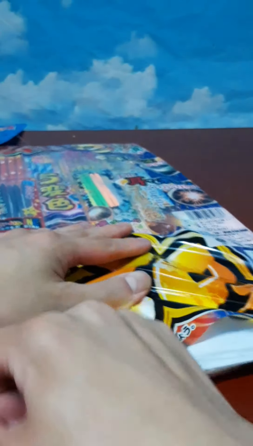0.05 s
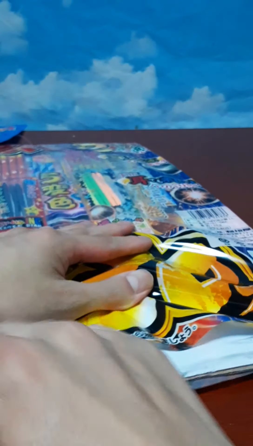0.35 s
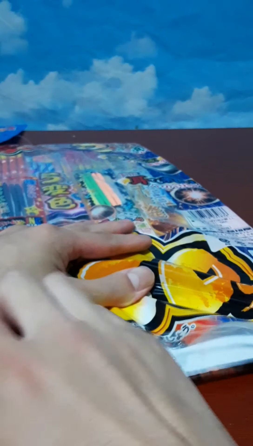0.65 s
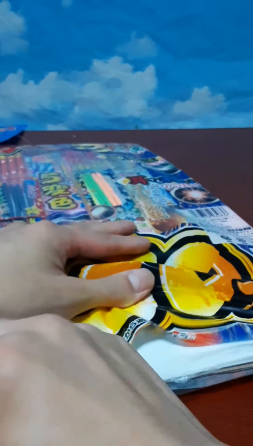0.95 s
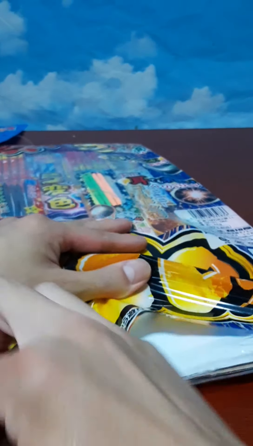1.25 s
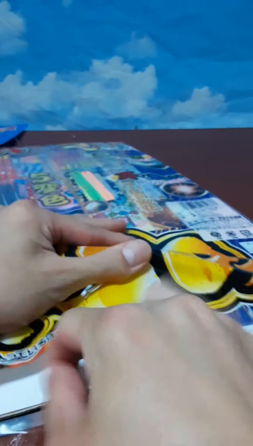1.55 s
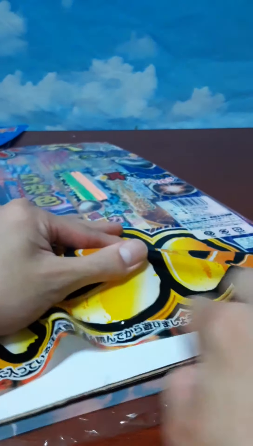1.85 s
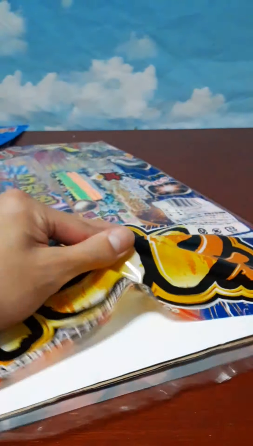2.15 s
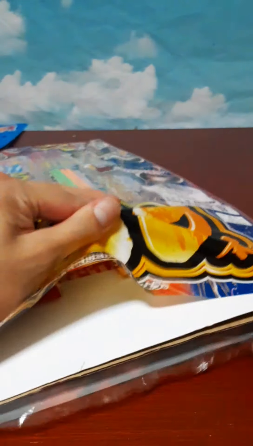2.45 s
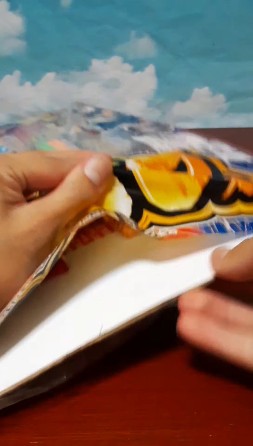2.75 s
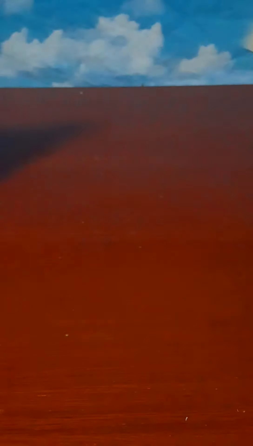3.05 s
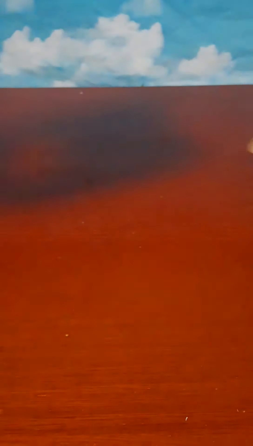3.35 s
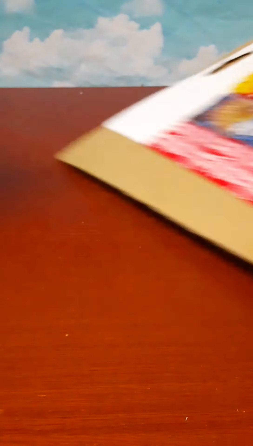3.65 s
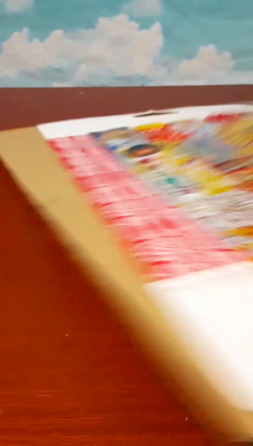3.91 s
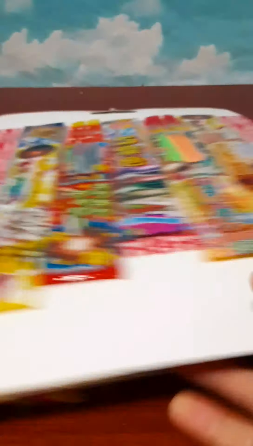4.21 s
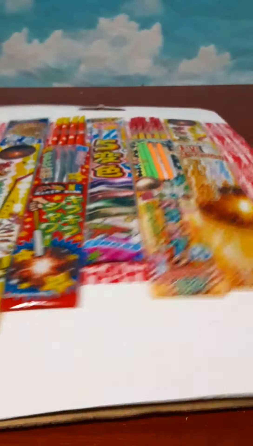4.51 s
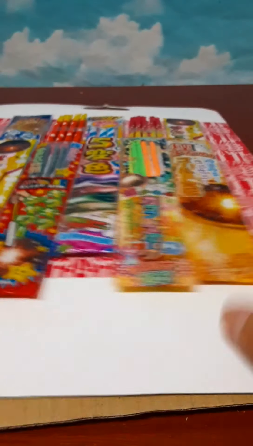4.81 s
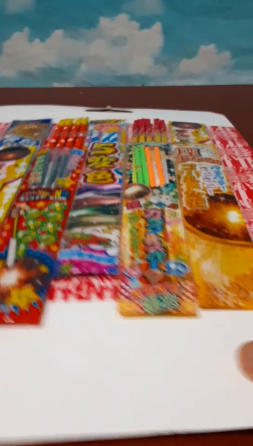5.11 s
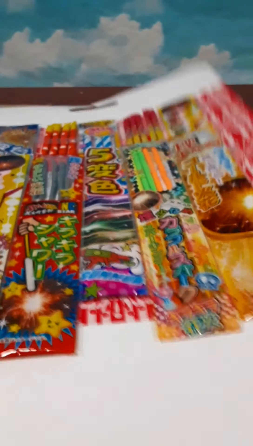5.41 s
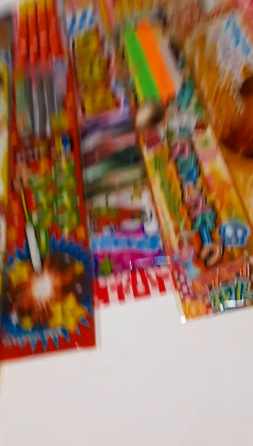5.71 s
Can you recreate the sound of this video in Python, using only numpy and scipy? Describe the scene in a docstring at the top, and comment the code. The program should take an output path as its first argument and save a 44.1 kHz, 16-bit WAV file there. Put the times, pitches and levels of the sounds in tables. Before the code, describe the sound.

Stiff plastic wrap on a card-backed package is handled close to the microphone. From the start to about 0.7 seconds it snaps and crackles sharply, with low puffs of air and a light knock at 0.3. More bright snaps come around 1.1 and 1.5 seconds, followed by softer, uneven crinkling and small bumps until 2.8. At about 2.9 seconds the pack flips over: the loudest moment, a crash of crackling film and loose contents with three quick knocks, dying away by 3.6. From 3.7 the pack is pushed over the table in a series of quieter papery rasps and rustles, strongest around 4.8. A dull, soft knock lands at 4.9, light sliding continues, and another soft knock comes at 5.7. The small bare room adds a short echo, with very faint air and a low drone underneath.

```python
"""A small bare room: on a table, close to a phone, hands work a card-backed package in stiff plastic wrap.
The film snaps as it buckles and crackles as it slides; its larger panels puff air at the microphones.
The pack flips over with a crash of loose contents, rasps across the table and is set down
with a couple of soft knocks. The walls add a short tail; faint air and a low drone lie underneath."""
import sys
import numpy as np
from scipy import signal
from scipy.fft import rfft, irfft, next_fast_len
from scipy.io import wavfile
from scipy.ndimage import uniform_filter1d, map_coordinates

SR = 44100
rng = np.random.default_rng(int(sys.argv[2]) if len(sys.argv) > 2 else 0)


def generate_wav(signal):
    """Clip the signal to [-1, 1] and save it as 16-bit WAV at the path in sys.argv[1]."""
    frames = np.transpose(np.atleast_2d(signal))
    scaled = np.clip(frames, -1, 1) * 32767
    pcm = np.round(scaled).astype(np.int16)
    wavfile.write(sys.argv[1], SR, pcm)


N = 263277
TIME = np.arange(N) / SR
FLIP_S = 2.936  # the pack turns over and its contents crash
TOP_HZ = 15900


# single buckles of the film: (time [s], energy as a 1 ms burst [dB], ring pitch [Hz], crack decay [ms])
BUCKLES = [(0.0334, -20.5, 3400, 1.7), (0.081, -19.5, 1150, 1.1), (0.1218, -7, 4870, 0.96),
           (0.1296, -10, 4750, 0.76), (0.1413, -8.5, 5630, 1.5), (0.2157, -6.5, 4900, 0.32),
           (0.2296, -14.5, 1330, 1.4), (0.3269, -9, 1070, 2.3), (0.366, -12.5, 1170, 4.3),
           (0.4626, -18.5, 4130, 6), (0.5169, -9, 3000, 0.9), (0.562, -7, 2580, 1.05), (0.573, -9, 4440, 1),
           (0.5949, -6, 3620, 0.53), (0.605, -6, 3960, 1), (0.6838, -19, 2040, 2.5),
           (0.7243, -25, 1720, 3.6), (0.7312, -21.5, 2230, 0.48), (0.7824, -18, 1680, 0.2),
           (0.9419, -24, 3000, 0.56), (0.9498, -20, 2490, 1.1), (1.0015, -19, 2250, 0.55),
           (1.0394, -20.5, 2280, 0.42), (1.0445, -22, 2160, 1.6), (1.0897, -20, 2500, 0.9),
           (1.1083, -10.5, 3400, 0.93), (1.141, -5.5, 3850, 2), (1.149, -14, 3450, 2.5),
           (1.1544, -8, 3700, 3.2), (1.2869, -25.5, 1240, 0.89), (1.3044, -23, 4700, 2.8),
           (1.3365, -29.5, 1400, 0.95), (1.359, -23.5, 2220, 0.81), (1.3992, -24.5, 1214, 2),
           (1.416, -22.5, 2340, 1.4), (1.4374, -17, 2520, 2.1), (1.4557, -14.5, 2120, 1.7),
           (1.473, -7.5, 2040, 2.2), (1.6229, -22.5, 2380, 5), (1.862, -22.5, 3020, 0.91),
           (1.8663, -15, 2310, 2), (1.9313, -16.5, 2330, 2.1), (1.9792, -19.5, 3000, 6.9),
           (2.067, -18.5, 10200, 4.5), (2.08, -16.5, 2420, 2.7), (2.121, -31, 4400, 2.1),
           (2.3291, -23.5, 8500, 1.1), (2.4975, -22.5, 4800, 0.29), (2.6331, -22.5, 2530, 0.31),
           (2.7252, -28, 1390, 0.79), (2.829, -18.5, 3000, 3), (2.924, -23, 2350, 0.43),
           (2.9397, -8.5, 3900, 4.6), (2.943, -9, 1980, 6.5), (2.9649, -5.5, 2230, 2.2),
           (3.009, -8, 3570, 6), (3.0385, -18, 2370, 4.1), (3.154, -20.5, 6500, 3),
           (3.1843, -26.5, 3300, 7.7), (3.36, -24, 4460, 2.3), (3.5384, -34.5, 6000, 0.7),
           (4.672, -23.5, 1600, 6.9), (4.7639, -27, 3630, 2.6), (4.846, -22, 4800, 3),
           (4.9278, -20.5, 6400, 2.1), (5.4665, -31, 7300, 1.2)]


def snaps(crack=2.2, ring_cycles=2.1, ring_db=4.0, ring_octaves=1.4, ring_mix=0.59, size=1024):
    """A crease flips with a sharp crack; bending waves scatter through the film and the facet rings."""
    out, t = np.zeros((2, N)), np.arange(size) / SR
    hz = np.geomspace(50, 16000, 36)
    # bending waves are dispersive: the treble arrives first
    delay_s = 0.00033 / np.sqrt(1 + np.fft.rfftfreq(size, 1 / SR) / 1000)
    dispersion = np.exp(-2j * np.pi * np.cumsum(delay_s) * SR / size)
    for s, db, ring_hz, decay_ms in BUCKLES:
        # harder snaps focus their energy in the ring; small, high facets have less body
        focus_db = 0.31 * (db + 12.5)
        body_db = -12.5 - 7 * np.log2(ring_hz / 3000) - focus_db
        edge_db = -9.5 - focus_db
        film_eq = [(50, body_db - 4.5), (400, body_db + 8.5), (900, body_db + 16), (1700, 2.5),
                   (5800, 4.4), (8200, edge_db + 3.5), (12000, edge_db + 7), (16000, edge_db + 2.5)]
        eq_db = at(film_eq, hz) + ring_db * bell(hz, ring_hz, ring_octaves)
        burst = stereo_noise(size, alike=0.28) * np.exp(-t * 1000 / decay_ms)
        burst[:, 0] -= crack
        scatter = unit(colour(irfft(rfft(burst) * dispersion), np.c_[hz, eq_db]))
        snap = click_level(scatter + ring_mix * facet_ring(t, ring_hz, ring_cycles), db)
        add(out, s, snap)
        # a faint click leads in just before the crease flips
        lead_s = 0.0028 * rng.uniform(0.25, 2)
        add(out, s - lead_s, snap * undb(-14.5) * rng.random())
    return out


def facet_ring(t, hz, cycles):
    """A facet of film rings for a few cycles, at a slightly different phase on each side."""
    phase = rng.standard_normal((2, 1))
    return unit(np.sin(2 * np.pi * hz * t + phase) * np.exp(-t * hz / cycles))


# EQ of the bright film and of the duller card: (frequency [Hz], gain [dB])
FILM_EQ = [(30, -50), (200, -26.5), (800, -8), (1500, 0.5), (2400, 2.5), (3800, -2), (5500, 1),
           (8000, -12.5), (11500, -9), (15000, -10.5)]
CARD_EQ = [(20, -50), (50, -9), (100, -3), (200, 1), (450, 5), (650, 4.5), (900, 7), (1300, 0.5),
           (2200, -1), (6000, -15.5)]


def rustle(film_trim_db=-2.5, slide_db=-4, bunch_db=2):
    """Sparse crackle over the hiss of sliding film and rubbing card, bunching up as the hands catch."""
    creases = grains(per_s=330, spread_db=4.8, ring_s=0.00055, alike=0.35)
    sliding = grains(per_s=6300, spread_db=2.5, ring_s=0.00042, alike=0.36)
    # fingers crease the film at first; once the pack is flipped it mostly slides
    crease_share = curve([(2.9, 0.13), (3.1, 0.046), (4.3, 0.024), (5.9, 0.033)])
    blend = np.sqrt(crease_share) * creases + undb(slide_db) * np.sqrt(1 - crease_share) * sliding
    film = unit(colour(blend, FILM_EQ))
    rubbing = grains(per_s=1100, spread_db=2.0, ring_s=0.00065, alike=0.99)
    card = unit(colour(rubbing, CARD_EQ))
    film_gain, card_gain = handling()
    both = film * film_gain * undb(film_trim_db) + card * card_gain
    return both * undb(bunch_db * wander(per_s=70))


# fingers tug at the wrap: (time [s], hold [s], relative film level [dB], relative card level [dB])
FINGER_TUGS = [(-0.02, 0.026, -31.5, -35.5), (0.048, 0.033, -30, -33), (0.136, 0.2, -36, -46.5),
               (0.4, 0.094, -49.5, -49), (0.5, 0.056, -40.5, -68), (0.59, 0.1, -33, -50),
               (0.709, 0.12, -37.5, -43.5), (0.931, 0.032, -29, -42.5), (1.026, 0.18, -41, -55.5),
               (1.129, 0.1, -31.5, -50), (1.24, 0.17, -39.5, -54.5), (1.441, 0.076, -40, -44.5),
               (1.569, 0.059, -48, -47), (1.661, 0.052, -38, -46), (1.764, 0.1, -45, -43.5),
               (1.867, 0.22, -41.5, -49.5), (2.07, 0.057, -37.5, -52), (2.16, 0.28, -46.5, -56.5),
               (2.457, 0.062, -39.5, -51.5), (2.574, 0.094, -43.5, -47), (2.704, 0.067, -49, -47),
               (2.784, 0.065, -38.5, -45.5)]


def handling():
    """Gain envelopes for film and card: the tugs, the crash and the pushes add up in power."""
    moves = [(swell(s, hold_s, attack_s=0.015, fall_db_per_s=337.5), film_db, card_db)
             for s, hold_s, film_db, card_db in FINGER_TUGS]
    # the loose contents crash together, then settle until they come to rest
    crash_film_db, crash_card_db = -22.5, -29.5
    crash = swell(FLIP_S, hold_s=0.11, attack_s=0.012, fall_db_per_s=258)
    settling = undb(-5.5) * swell(FLIP_S, hold_s=0.44, attack_s=0.012, fall_db_per_s=103)
    since_s = np.maximum(TIME - FLIP_S, 0)
    moves.append((crash, crash_film_db, crash_card_db))
    moves.append((settling, crash_film_db - 27 * since_s, crash_card_db - 38 * since_s))
    for s, hold_s, film_db, _, rasp_hz in TABLE_PUSHES:
        # loose card, with its low rasp, rubs loudest
        card_db = film_db - 7.5 - 0.64 * np.log2(rasp_hz / 1700)
        moves.append((swell(s, hold_s, PUSH_ATTACK_S, PUSH_FALL_DB_PER_S), film_db, card_db))
    film_power = sum((shape * undb(db)) ** 2 for shape, db, _ in moves)
    card_power = sum((shape * undb(db)) ** 2 for shape, _, db in moves)
    return np.sqrt(film_power), np.sqrt(card_power)


PUSH_ATTACK_S, PUSH_FALL_DB_PER_S = 0.064, 107
# the turned pack is pushed over the table:
# (time [s], hold [s], relative film level [dB], relative rasp level [dB], rasp centre [Hz])
TABLE_PUSHES = [(3.704, 0.039, -49.5, -51.5, 12200), (3.842, 0.35, -50, -58, 11500),
                (4.006, 0.13, -41, -50.5, 900), (4.18, 0.11, -37.5, -51, 1680),
                (4.322, 0.086, -39.5, -43.5, 1550), (4.544, 0.11, -39, -40.5, 1670),
                (4.685, 0.07, -36.5, -40.5, 3870), (4.794, 0.14, -32.5, -46, 4500),
                (5.028, 0.13, -46, -68, 1980), (5.19, 0.13, -45, -50, 14600), (5.42, 0.39, -46.5, -55, 990),
                (5.848, 0.063, -49.5, -48, 1700)]


def scrape(trim_db=-4.52, rasp_octaves=0.58):
    """Dense stick-slip rasps under each push: low on loose card, high on taut film."""
    size = next_fast_len(N)
    hz = np.fft.rfftfreq(size, 1 / SR)
    slip_spectrum = rfft(grains(per_s=2700, spread_db=0.5, ring_s=0.00015, alike=0.26), size)
    envelopes = np.array([swell(s, hold_s, PUSH_ATTACK_S, PUSH_FALL_DB_PER_S) * undb(rasp_db)
                          for s, hold_s, _, rasp_db, _ in TABLE_PUSHES])
    rasp_hz = np.array(TABLE_PUSHES)[:, -1]
    out = np.zeros((2, N))
    for centre in np.geomspace(600, 15000, 12):
        band = unit(irfft(slip_spectrum * bell(hz + 1, centre, octaves=0.25), size)[:, :N])
        # each push opens the bands around its own resonance
        out += band * (bell(centre, rasp_hz, rasp_octaves) @ envelopes)
    return out * undb(trim_db)


# EQ of tiny creases letting go: (frequency [Hz], gain [dB])
TICK_EQ = [(100, -35.5), (700, 0.5), (2000, -3.5), (5500, 2.5), (8000, -5.5), (12000, -1), (15000, -6)]


def ticks(per_s=75, base_db=-31, spread_db=4.5, sliding_db=-6, ring_hz=3600, ring_mix=0.62, size=256):
    """Lone creases let go at random as the wrap is worked, each at its own pitch; softer after the flip."""
    out, t = np.zeros((2, N)), np.arange(size) / SR
    film_gain, _ = handling()
    effort = (film_gain / undb(-40)) ** 0.9
    times = np.cumsum(rng.gamma(2, 0.5, 700)) / per_s
    variations = np.clip(rng.standard_normal((len(times), 2)), -2, 2)
    for s, (strength, pitch) in zip(times, variations):
        hz = min(ring_hz * 2 ** (0.72 * pitch), TOP_HZ)
        crack = unit(stereo_noise(size, alike=0.18) * np.exp(-t / 0.00031))
        db = base_db + spread_db * strength + sliding_db * (s > FLIP_S)
        tick = click_level(crack + ring_mix * facet_ring(t, hz, cycles=1.54), db)
        add(out, s, tick * effort[min(int(s * SR), N - 1)])
    return colour(out, TICK_EQ)


# modes of the pack and table top: (frequency [Hz], relative level [dB], t60 [s])
BOARD_MODES = [(87, -5, 0.18), (121.5, -5.5, 0.068), (134, 1.5, 0.033), (190, -5, 0.066), (267, -2.5, 0.14),
               (393, -2, 0.17), (421, -4, .16), (530, 7.5, 0.047), (760, -27, .12), (863, -4, 0.09),
               (1080, -24, .1)]
# the pack bumps: (time [s], peak level [dB], contact [ms], left minus right [dB])
BUMPS = [(0.328, -22.5, 0.74, 0.5), (1.624, -27.5, 0.57, 4.5), (2.082, -31, 1.4, 4),
         (2.828, -35.5, 0.78, 0), (2.944, -13.5, 1.04, 4), (2.9644, -15, 0.6, 13), (3.042, -19, 0.86, 4),
         (4.910, -24.5, 4.5, -3.5), (4.955, -38, 4, 1), (5.7103, -27.5, 0.95, 2.5)]


def knocks(slap_mix=4.8, slap_hz=290, slap_s=0.0012, size=16384):
    """Each bump rings the board and slaps the card; a softer contact leaves only the low modes."""
    out, t = np.zeros((2, N)), np.arange(size) / SR
    ring = sum(undb(db) * np.cos(2 * np.pi * hz * t) * decay(t, t60) for hz, db, t60 in BOARD_MODES)
    slap = slap_mix * np.cos(2 * np.pi * slap_hz * t) * np.exp(-t / slap_s)
    # a board this small radiates no deep bass
    radiated = low_cut(ring + slap, hz=92, order=3)
    for s, db, contact_ms, side_db in BUMPS:
        force = np.sin(np.pi * np.minimum(t * 1000 / contact_ms, 1))
        knock = signal.fftconvolve(radiated, force)[:size]
        add(out, s, knock / np.abs(knock).max() * undb(db) * pan(side_db))
    return out


# film panels pop through: (time [s], level [dB], swing [Hz], t60 [s], left minus right [dB])
PANEL_POPS = [(0.122, -25, 80, 0.034, -19), (0.139, -44, 80, 0.031, -13), (0.215, -29.5, 80, 0.014, 22),
              (0.519, -31, 72, 0.093, 30), (0.5616, -45.5, 80, 0.056, 16), (0.5734, -45, 80, 0.059, 16),
              (0.5947, -20, 72, 0.019, -1.5), (.606, -20.5, 58, 0.069, -32), (1.1088, -25.5, 70, 0.093, 20),
              (1.1434, -21, 74, 0.087, -4), (2.943, -23.5, 61.9, 0.056, 7), (2.972, -29, 85, 0.062, 6)]


def puffs(suction=1.3, suction_s=0.00083, detune=0.084, size=8192):
    """A popping panel sucks air, then swings heavily, a little differently at each microphone."""
    out, t = np.zeros((2, N)), np.arange(size) / SR
    pull = suction * (t / suction_s) * np.exp(1 - (t / suction_s) ** 2)
    for s, db, hz, t60, side_db in PANEL_POPS:
        stereo_hz = hz * (1 + detune * np.array([[1], [-1]]))
        swing = np.sin(2 * np.pi * stereo_hz * t) * decay(t, t60)
        add(out, s, (swing - pull) * undb(db) * pan(side_db))
    return out


# where the hands work: (time [s], left minus right [dB], left delay [ms])
HAND_PATH = [(0, 0, -0.0092), (1.5, -2.5, 0.1), (2.2, -0.5, -0.087), (2.95, 1.5, -0.21), (3.4, 2, -0.29),
             (4.3, 0.5, 0.048), (4.8, -0.5, 0.29), (5.3, 2, 0.24), (5.9, 2, 0.12)]


def place(x):
    """The pack drifts between left and right, with a shifting level difference and a small delay."""
    lag_samples = curve(HAND_PATH, column=2) * SR / 1000
    left = map_coordinates(x[0], [np.arange(N) - lag_samples], order=5)
    return np.array([left, x[1]]) * pan(curve(HAND_PATH))


# length of the reverb tail: (frequency [Hz], t60 [s])
TAIL_T60 = [(100, 0.55), (500, 1), (2000, 0.7), (5000, 0.34), (10000, 0.13), (15000, 0.29)]
# EQ of the tail: (frequency [Hz], gain [dB])
TAIL_EQ = [(50, -6.5), (110, -1), (300, -6), (900, -13), (2500, -10), (5000, -5.5), (8000, -1.5),
           (15000, -3.5)]
# standing waves between the walls: (frequency [Hz], relative level [dB])
STANDING_WAVES = [(94, -2.5), (118, 0), (378, -16), (435, 6), (530, 1), (759, 0), (845, 5), (1095, 1)]


def room(x, wet_db=-6.0, predelay_s=0.0087, build_s=0.0017, modes_db=-66, bands=14):
    """Bare walls: a dense tail builds after a short gap and dies sooner in the treble; a few modes ring."""
    t, hz = TIME[:SR], np.fft.rfftfreq(SR, 1 / SR)
    centres = np.geomspace(60, 16000, bands)
    tail = np.zeros((2, SR))
    for k, centre in enumerate(centres):
        band = np.sqrt(at(np.c_[centres, np.arange(bands) == k], hz))
        # long waves reach both microphones alike
        noise = stereo_noise(SR, alike=1 / (1 + (centre / 800) ** 2))
        tail += irfft(rfft(noise) * band) * decay(t, at(TAIL_T60, centre))
    onset = 1 - np.exp(-np.maximum(t - predelay_s, 0) / build_s)
    tail = colour(unit(tail * onset) / np.sqrt(SR), TAIL_EQ)
    for mode_hz, db in STANDING_WAVES:
        wave = np.sin(2 * np.pi * (mode_hz * t + rng.random()))
        tail += undb(modes_db + db) * onset * wave * decay(t, at(TAIL_T60, mode_hz))
    return undb(wet_db) * signal.fftconvolve(x, tail, axes=1)[:, :N]


# EQ of the room air: (frequency [Hz], gain [dB])
AIR_EQ = [(25, -88), (60, 9.5), (100, -29), (200, 1), (280, -30), (420, -42.5), (620, -6), (820, -2.5),
          (1050, -3), (2500, -11.5), (8000, -104), (15000, -74)]
# partials of the low drone: (frequency [Hz], level before the fader [dB])
DRONE_PARTIALS = [(102, -67.5), (140, -72), (194, -71.5), (280, -72.5)]
# fader ride on the drone: (time [s], gain [dB])
DRONE_FADER = [(0, -18), (2.8, 4), (3.6, -7), (4.1, -6.5), (4.9, 8), (5.9, 2)]


def room_tone(air_db=-63, waver_db=2.5):
    """A bed of faint air and a low drone whose partials waver in level and phase."""
    air = unit(colour(stereo_noise(N, alike=0.6), AIR_EQ)) * undb(air_db)
    drone = np.zeros(N)
    for hz, db in DRONE_PARTIALS:
        amplitude = np.sqrt(2) * undb(db - waver_db * wander(per_s=43))
        drone += amplitude * np.sin(2 * np.pi * hz * TIME + wander(per_s=9.7))
    return air + drone * undb(curve(DRONE_FADER))


def grains(per_s, spread_db, ring_s, alike, facets=14, size=256):
    """Tiny slips at random moments, mostly weak, from several facets that each scatter in their own way."""
    out, t = np.zeros((2, N)), np.arange(size) / SR
    for _ in range(facets):
        strength = undb(spread_db * np.minimum(rng.exponential(size=N), 3.5))
        fires = rng.random(N) < per_s / facets / SR
        slips = fires * strength * rng.choice([-1, 1], N)
        facet = unit(stereo_noise(size, alike) * np.exp(-t / ring_s))
        out += signal.oaconvolve(slips[None], facet, axes=1)[:, :N]
    return unit(out)


def swell(s, hold_s, attack_s, fall_db_per_s):
    """Envelope of one movement: it rises from time s and starts to die away hold_s later."""
    rise = np.clip((TIME - s) / attack_s, 0, 1)
    return rise * undb(-fall_db_per_s * np.maximum(TIME - s - hold_s, 0))


def decay(t, t60):
    """Fall by 60 dB every t60 seconds."""
    return np.exp(-np.log(1000) * t / t60)


def wander(per_s):
    """Smooth random drift with an rms of one."""
    hold = int(SR / per_s)
    steps = np.repeat(rng.standard_normal(N // hold + 1), hold)
    return unit(uniform_filter1d(steps, hold)[:N])


def stereo_noise(size, alike):
    """Two noises that share the fraction `alike` of their power."""
    noise = rng.standard_normal((size, 3)).T
    return np.sqrt(alike) * noise[0] + np.sqrt(1 - alike) * noise[1:]


def colour(x, eq, size=2048):
    """Minimum-phase EQ through (frequency [Hz], gain [dB]) points."""
    gain = undb(at(eq, np.fft.rfftfreq(size, 1 / SR)))
    cepstrum = irfft(np.log(gain))
    cepstrum[1:size // 2] *= 2
    cepstrum[size // 2 + 1:] = 0
    impulse = irfft(np.exp(rfft(cepstrum)))
    return signal.fftconvolve(x, impulse[None], axes=1)[:, :x.shape[1]]


def low_cut(x, hz, order):
    """Roll off the bass below hz."""
    return signal.sosfilt(signal.butter(order, hz, "high", fs=SR, output="sos"), x)


def bell(hz, centre_hz, octaves):
    """Bell curve on a log-frequency axis."""
    return np.exp(-(np.log2(hz / centre_hz) / octaves) ** 2)


def at(points, hz):
    """Read a table on a log-frequency axis."""
    frequencies, values = np.transpose(points)
    return np.interp(np.log(np.maximum(hz, 1)), np.log(frequencies), values)


def curve(rows, column=1):
    """One column of a timed table at every sample."""
    rows = np.array(rows)
    return np.interp(TIME, rows[:, 0], rows[:, column])


def pan(db):
    """Constant-power left and right gains for a level difference."""
    gains = undb(np.array([db, -db]).reshape(2, -1) / 2)
    return gains / np.sqrt(np.mean(gains ** 2, axis=0))


def click_level(x, db):
    """Give a click the energy of a 1 ms burst at this level."""
    return unit(x) * np.sqrt(SR / 1000 / x.shape[1]) * undb(db)


def undb(db):
    """Decibels to gain."""
    return 10 ** (np.asarray(db) / 20)


def unit(x):
    """Scale to an rms of one."""
    return x / np.sqrt(np.mean(x ** 2))


def add(out, s, sound):
    """Mix a stereo sound in at time s."""
    i = max(int(s * SR), 0)
    out[:, i:i + sound.shape[1]] += sound[:, :max(N - i, 0)]


def scene():
    """The package in the room; the puffs reach only the nearby microphones and stay dry."""
    package = snaps() + ticks() + rustle() + scrape() + knocks()
    return place(package) + room(package) + puffs() + room_tone()


def record(dry):
    """The phone thins the deepest bass, rounds the highest peaks and cuts the top."""
    thin = low_cut(dry, hz=33, order=2)
    rounded = 0.9 * np.tanh(thin / 0.9)
    return signal.sosfilt(signal.ellip(8, 0.2, 70, TOP_HZ, fs=SR, output="sos"), rounded)


dry = scene()
out = record(dry)
generate_wav(out)
```